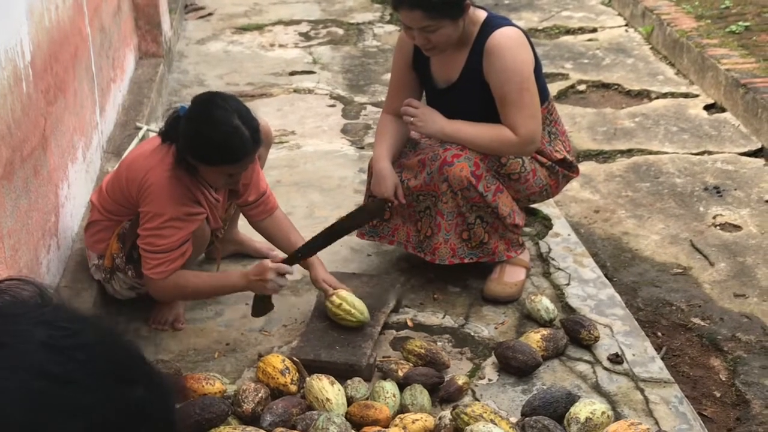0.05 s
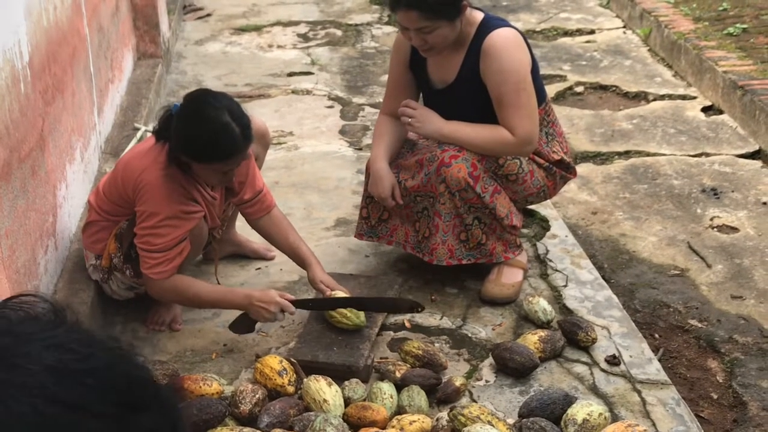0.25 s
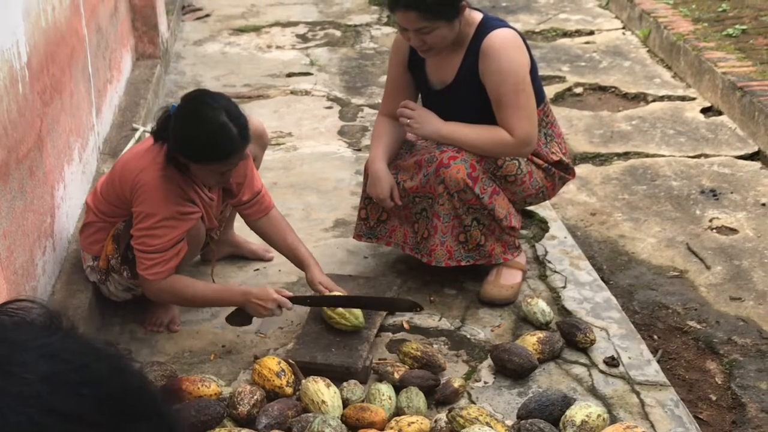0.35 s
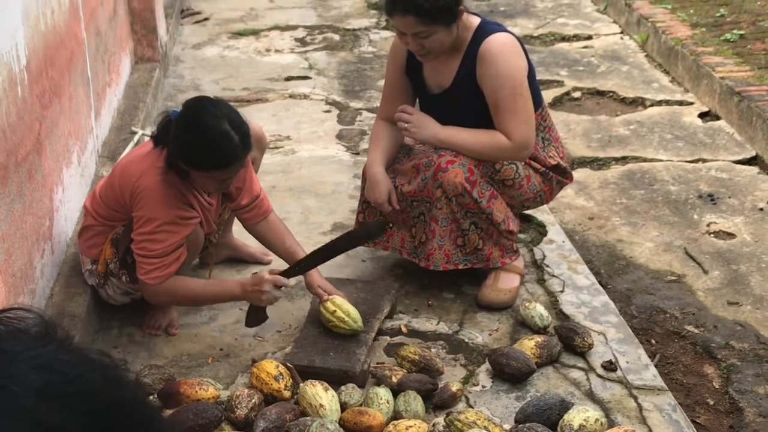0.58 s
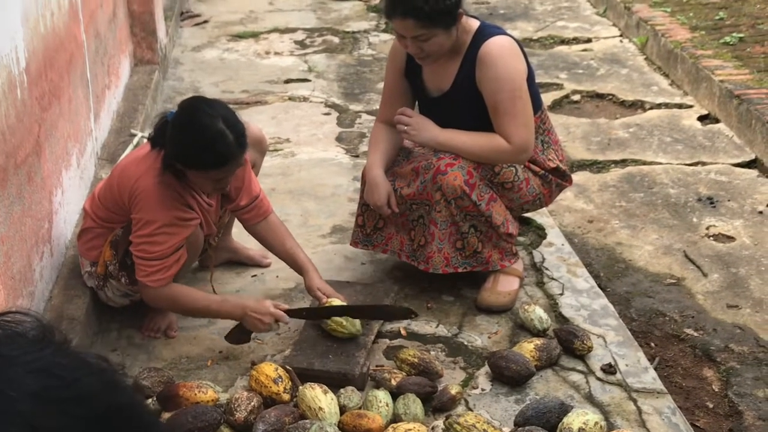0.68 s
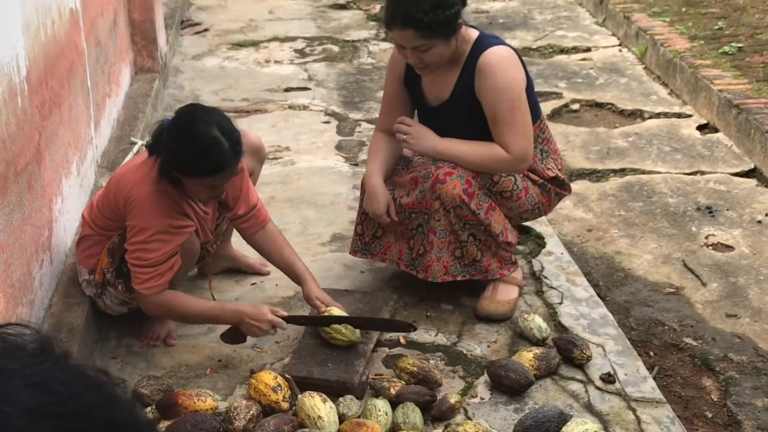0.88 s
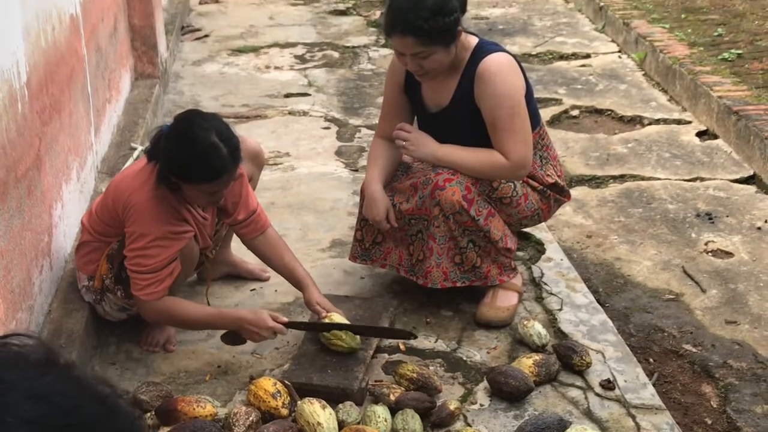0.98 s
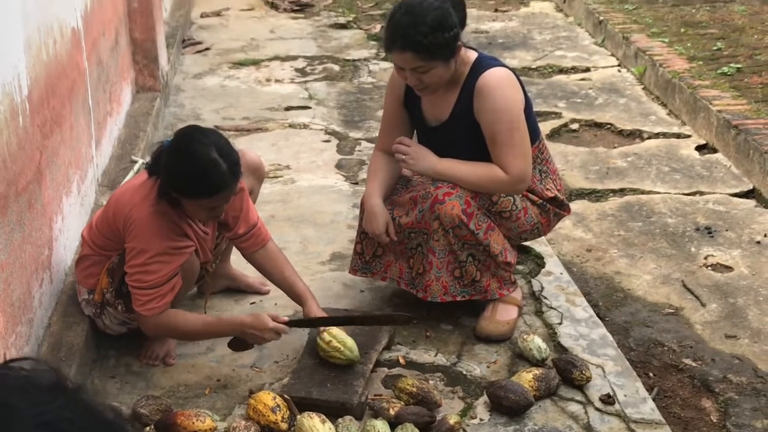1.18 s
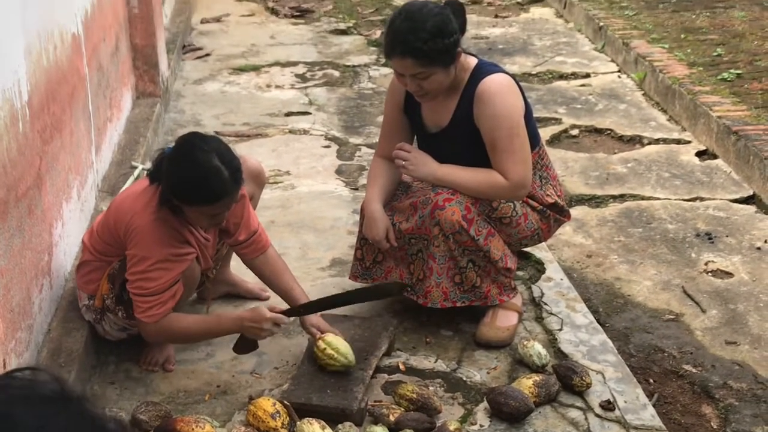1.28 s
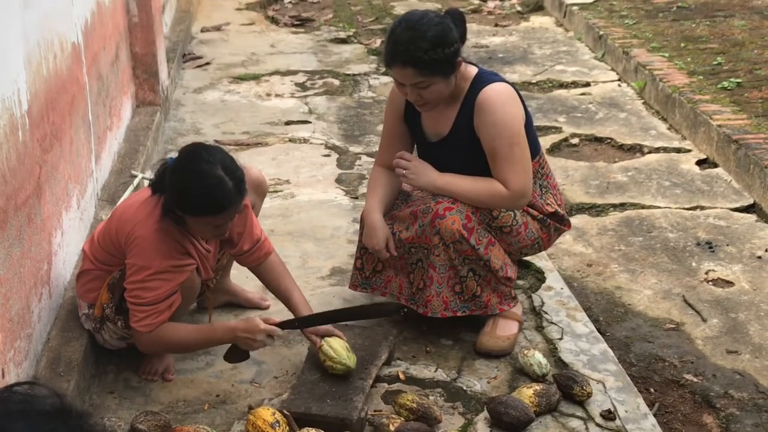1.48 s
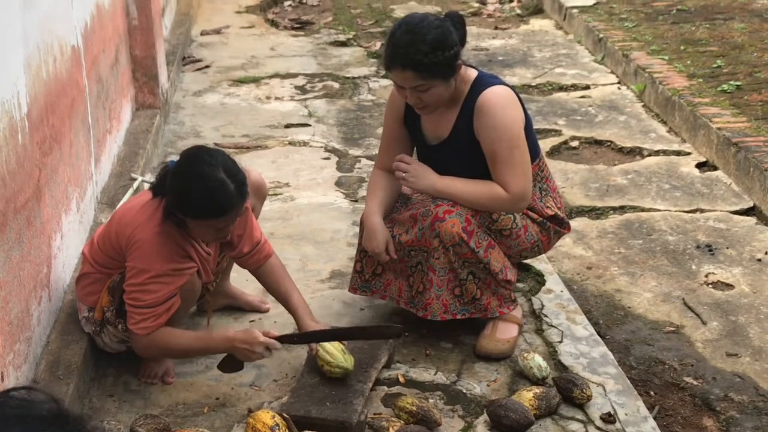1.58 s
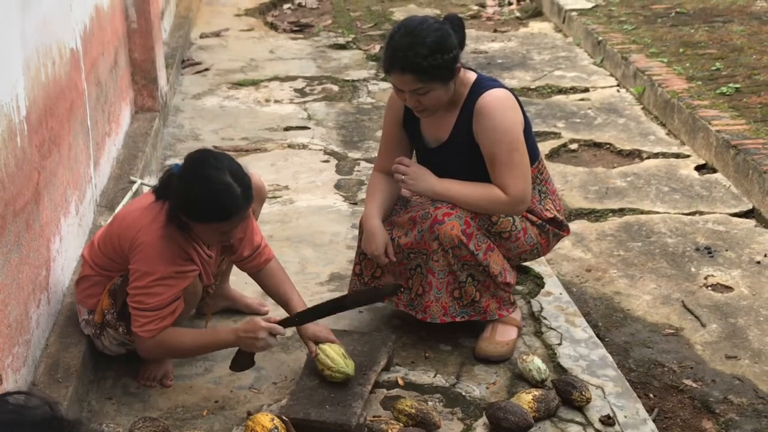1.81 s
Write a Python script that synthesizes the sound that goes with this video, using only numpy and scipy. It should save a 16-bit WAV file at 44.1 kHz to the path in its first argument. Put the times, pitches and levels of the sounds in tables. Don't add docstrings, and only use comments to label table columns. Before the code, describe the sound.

A machete chops twice into a hard fruit pod on a wooden board in a paved alley

```python
import sys
import numpy as np
from scipy import signal
from scipy.io import wavfile

SR = 44100
rng = np.random.default_rng(int(sys.argv[2]) if len(sys.argv) > 2 else 0)


def gain_from_db(level_db):
    decades = np.asarray(level_db, float) / 20
    return 10 ** decades


def wav_out(sig):
    wavfile.write(sys.argv[1], SR, np.round(np.clip(np.atleast_2d(sig).T, -1, 1) * 32767).astype(np.int16))


N = 81585

# (blade enters [s], time to full bite [s], hold [s], crunch level [dB], board knocked [s])
CHOP_EVENTS = [
    (0.2203, 0.005, 0.0025, -17, 0.2268),
    (0.7408, 0.000805, 0.0083, -21.5, 0.7425),
]
# (frequency [Hz], density [dB per Hz])
CRUNCH_COLOURS = [
    [(600, 13.5), (900, -0.5), (1850, -8.5), (2300, -3), (3740, -5), (7570, -5), (11500, -10), (16000, -4)],
    [(350, 4), (600, 5), (1340, 0), (1900, -13.5), (2400, -2), (6000, -6), (11300, -7), (16000, -6.5)],
]


def rms_one(x):
    return x / np.sqrt(np.mean(x ** 2) + 1e-20)


def in_time(rows):
    s, *columns = np.transpose(rows)
    return [np.interp(np.arange(N) / SR, s, c) for c in columns]


def at_hz(points, hz):
    table_hz, values = np.array(points).T
    return np.interp(np.log(hz), np.log(table_hz), values)


def drift(rate_hz):
    r = np.exp(-2 * np.pi * rate_hz * 40 / SR)
    settle = 2000
    noise = rng.standard_normal(N // 40 + 2 + settle)
    slow = signal.lfilter([1], [1, -2 * r, r * r], noise)[settle:]
    return np.interp(np.arange(N) / 40, np.arange(len(slow)), rms_one(slow))


def ring(x, hz, t60):
    r = gain_from_db(-60 / (t60 * SR))
    w = 2 * np.pi * hz / SR
    return signal.lfilter([0, np.sin(w)], [1, -2 * r * np.cos(w), r * r], x + 1e-18)


def band(x, low_hz, high_hz):
    edges = [low_hz, min(high_hz, 0.47 * SR)]
    return signal.sosfilt(signal.butter(2, edges, "band", fs=SR, output="sos"), x)


def bank(sources, gain):
    edges = 22 * 2 ** np.arange(0, 9.8, 1 / 3)
    total = 0
    for k, (low, high) in enumerate(zip(edges, edges[1:])):
        total = total + gain(np.sqrt(low * high)) * band(sources[k % len(sources)], low, high)
    return total


def bed(spectrum, patchy_db):
    (low_hz, low_db), (high_hz, high_db) = spectrum[0], spectrum[-1]
    colour = [(low_hz / 2, low_db - 30)] + list(spectrum) + [(high_hz * 2, high_db - 20)]
    noise = rng.standard_normal((2, N))
    return rms_one(bank(noise, lambda hz: gain_from_db(at_hz(colour, hz) + patchy_db * drift(9.6))))


def hum():
    # (time [s], frequency [Hz], level [dB])
    low_tone = [(0, 61.8, -46), (.2, 62.86, -49.5), (.45, 62.46, -51.5), (.65, 63, -57), (.8, 65.8, -47.5),
                (1.0, 66.95, -55.5), (1.15, 61.7, -49.5), (1.3, 60.42, -55), (1.85, 58.8, -52)]
    high_tone = [(0, 156.6, -51.5), (.12, 156.2, -45.5), (.3, 153.5, -49.5), (.75, 154, -59),
                 (.95, 160.1, -52), (1.05, 153, -51), (1.2, 149.8, -48.5), (1.5, 150.8, -55.5),
                 (1.85, 150, -55.5)]
    flutter_db = 2
    total = 0
    for rows in (low_tone, high_tone):
        hz, db = in_time(rows)
        sine = np.sin(2 * np.pi * np.cumsum(hz) / SR)
        total = total + np.sqrt(2) * gain_from_db(db + flutter_db * drift(12.0)) * sine
    return total


def rumble():
    # (frequency [Hz], density [dB per Hz])
    rumble_colour = [(15, -30), (25, 14.5), (54, -5), (102, 1), (151, -2), (293, -12.5), (368, -18.5),
                     (868, -28), (1200, -26), (1560, -65), (2640, -120)]
    # (time [s], level [dB])
    swelling = [(0, 5), (.4, 2.5), (.65, 1.5), (.95, 4), (1.15, 10), (1.3, 4.5), (1.5, 6), (1.85, 2.5)]
    return gain_from_db(-52 + in_time(swelling)[0]) * bed(rumble_colour, patchy_db=3.0)


def air():
    # (frequency [Hz], density [dB per Hz])
    air_colour = [(600, -1), (1500, -5), (3000, -8.5), (6500, -12), (8000, -15.5), (11000, -13.5),
                  (13500, -17), (16000, -6)]
    # (time [s], level [dB])
    rustling = [(0, -1.5), (.2, 0), (.4, 5), (.65, 3.5), (.72, 0.5), (.95, -1), (1.4, -1.5), (1.5, 1),
                (1.62, -1.5), (1.85, -2)]
    return gain_from_db(-64.5 + in_time(rustling)[0]) * bed(air_colour, patchy_db=1.4)


def insects():
    # (frequency [Hz], width [Hz], level [dB])
    cricket_bands = [(5340, 200, -76), (5250, 27, -74.5), (5473, 153, -71), (5750, 350, -80)]
    katydid_hz = [12700, 13900, 15000]
    first_s, period_s, katydid_db = 0.0555, 0.1024, -57.5
    others_per_s, others_db = 22, -60.5
    choir = 0
    for hz, width, db in cricket_bands:
        choir = choir + gain_from_db(db) * rms_one(band(rng.standard_normal(N), hz - width / 2, hz + width / 2))
    tick = gain_from_db(others_db + 2.8 * rng.standard_normal(N)) * (rng.random(N) < others_per_s / SR)
    steady_s = first_s + period_s * np.arange(18)
    tick[(steady_s * SR).astype(int)] = gain_from_db(katydid_db)
    return choir + sum(ring(tick, hz, t60=0.003) for hz in katydid_hz)


def engine():
    # (time [s], level [dB])
    throb = [(0, -50), (.15, -56.5), (.25, -47.5), (.65, -47.5), (.8, -52), (.95, -71.5), (1.85, -71)]
    # (frequency [Hz], level [dB], t60 [s])
    exhaust = [(90, -6.5, 0.29), (121.5, 10.5, 0.13)]
    first_s, period_s, count = 0.043, 0.0652, 27
    fire = np.zeros(N)
    firing_s = first_s + period_s * np.arange(count)
    fire[(firing_s * SR).astype(int)] = gain_from_db(0.491 * rng.standard_normal(count))
    puffs = band(sum(gain_from_db(db) * ring(fire, hz, t60) for hz, db, t60 in exhaust), 63, 141)
    return gain_from_db(in_time(throb)[0] + 4) * rms_one(puffs)


def grains(count):
    per_s, spread_db = 10000, 4
    happens, strength, side = rng.random((count, 3)).T
    snaps = (happens < per_s / SR) * gain_from_db(-spread_db * np.log(strength + 0.01))
    return rms_one(snaps * np.sign(side - 0.5))


def ticks():
    # (time [s], level [dB], frequency [Hz], length [s])
    small_ticks = [(0.13, -68, 9000, 0.0038), (0.159, -62.5, 4200, 0.013), (0.168, -51.5, 10600, 0.002),
                   (0.211, -63, 2980, 0.0078), (0.383, -55, 2900, 0.0064), (0.442, -60, 3200, 0.011),
                   (0.4602, -42, 4730, 0.0037), (0.4635, -52, 7400, 0.0015), (0.4639, -52, 14000, 0.003),
                   (0.4645, -54.5, 2430, 0.0026), (0.4845, -56, 12000, 0.0019), (0.503, -54, 14500, .002),
                   (0.619, -57.5, 2700, 0.0079), (0.628, -59, 9000, 0.0059), (0.648, -54.5, 12000, 0.0031),
                   (0.654, -62, 2970, 0.0076), (0.671, -62, 13500, .002), (0.688, -48, 2870, 0.0051),
                   (0.689, -55, 8000, 0.0024), (0.72, -61, 13500, .002), (0.732, -55, 3240, 0.0067),
                   (0.741, -38, 6030, 0.0022), (0.955, -67, 7500, .002), (0.994, -55, 10000, 0.0035),
                   (1.126, -60.5, 5860, 0.0032), (1.131, -64, 2580, 0.0038), (1.051, -67.5, 1100, 0.11),
                   (1.54, -68, 3370, .015), (1.324, -65, 11060, 0.0022), (1.33, -64, 10100, .002),
                   (1.435, -63, 1301, 0.012), (1.444, -67, 3320, 0.014), (1.448, -63.5, 7500, .004),
                   (1.471, -61, 2900, 0.004), (1.472, -64, 9000, .002), (1.537, -68, 6530, 0.025),
                   (1.56, -64, 8000, 0.002), (1.576, -62, 2398, 0.0068)]
    half_width_octaves, dies_db = 0.55, 9
    out = np.zeros(N + SR)
    t = np.arange(SR // 8) / SR
    for s, db, hz, length in small_ticks:
        low_hz, high_hz = hz * 2 ** -half_width_octaves, hz * 2 ** half_width_octaves
        puff = rms_one(band(grains(len(t)), low_hz, high_hz))
        start = int(s * SR)
        out[start:start + len(t)] += gain_from_db(db - dies_db * (t / length) ** 2) * puff
    return out[:N]


def scatter(colour):
    # (frequency [Hz], t60 [s])
    alley_decay = [(200, 0.33), (700, 0.2), (2000, 0.19), (6000, 0.18), (14000, 0.14)]
    far_db, far_t60_s, patchy_db = -25, 0.67, 0.8
    t = np.arange(SR * 2 // 3) / SR
    shared_patches = patchy_db * drift(82)[:len(t)]

    def gain(hz):
        decay = gain_from_db(-60 * t / at_hz(alley_decay, hz)) + gain_from_db(far_db - 60 * t / far_t60_s)
        own_patches = patchy_db * drift(82)[:len(t)]
        return gain_from_db(at_hz(colour, hz) + shared_patches + own_patches) * decay

    tail = bank(rng.standard_normal((2, len(t))), gain)
    return t, tail / np.sqrt(np.mean(tail[:SR // 100] ** 2))


def alley(x):
    t, tail = scatter([(100, 0.011), (16000, 0.0042)])
    delayed = tail * (t > 0.0014) / np.sqrt(np.sum(tail ** 2))
    return gain_from_db(-13) * signal.fftconvolve(x, delayed)[:N]


def crunch():
    lowest_hz = [1500, 500]
    bite_rise_db, t60_s = 17.5, 0.033
    out = np.zeros(N)
    t = np.arange(SR // 10) / SR
    for (s, rise, hold, db, _), colour, low_hz in zip(CHOP_EVENTS, CRUNCH_COLOURS, lowest_hz):
        ends = [(colour[0][0] / 2, colour[0][1] - 20)] + list(colour)
        coloured = bank([grains(len(t))], lambda hz: gain_from_db(at_hz(ends, hz)))
        fibres = rms_one(band(coloured, low_hz, SR))
        bite = -bite_rise_db * np.clip(1 - t / rise, 0, 1)
        stop = -60 * np.clip(t - rise - hold, 0, 1) / t60_s
        start = int(s * SR)
        out[start:start + len(t)] += gain_from_db(db + bite + stop) * fibres
    return out


def cracks():
    # (time [s], peak level [dB], frequency [Hz], time rung
    snaps = [(0.2245, -4, 9800, 8.2), (0.2264, -9, 6040, 8), (0.2255, -14, 14500, 9.2),
             (0.2256, -21, 2290, 30), (0.743, -35, 2316, 79), (0.2247, -16, 3630, 19),
             (0.227, -10, 11360, 35), (0.7397, -31, 2800, 5.5), (0.7412, -17.5, 3115, 35),
             (0.742, -16.5, 5640, 62), (0.7455, -14.5, 6730, 45), (0.747, -24, 4500, 7.3),
             (0.7495, -17, 5800, 51), (0.7499, -12, 11340, 34), (0.4608, -29, 5500, 5),
             (0.4848, -40, 11000, 5)]
    out = np.zeros(N)
    for s, db, hz, cycles in snaps:
        start = int(s * SR)
        click = np.zeros(N - start)
        click[0] = gain_from_db(db)
        out[start:] += ring(click, hz, cycles / hz)
    return out


def knock():
    # (frequency [Hz], t60 [s], first chop [dB], second chop [dB])
    modes = [(183, 0.064, -22.5, -25.5), (267, 0.12, -23.5, -39), (289.8, 0.16, -24.5, -32.5),
             (376.5, 0.099, -25.5, -31), (467, 0.05, -50, -66), (601.4, .13, -24, -32),
             (640, 0.16, -30, -36.5), (713, 0.072, -24, -35.5), (852, 0.051, -19, -26.5),
             (912, 0.045, -15.5, -43), (1029, 0.06, -32, -27.5), (1277, 0.032, -25, -34.5),
             (1470, 0.063, -37, -25.5), (1650, 0.15, -48.5, -36)]
    shudder_cycles, longest_t60_s, longest_cycles = 0.9, 0.2, 100
    struck = [int(chop[4] * SR) for chop in CHOP_EVENTS]
    out = 0
    for k, (hz, t60, *db) in enumerate(modes):
        push = np.zeros(N)
        push[struck] = gain_from_db(np.array(db)) * (-1) ** k
        mode = ring(push, hz, min(t60, longest_t60_s, longest_cycles / hz))
        swell_t60 = 3 * shudder_cycles / hz
        out = out + ring(mode, hz, swell_t60) * 2 * np.log(1000) / (swell_t60 * SR)
    return out


def echoes():
    echo_db = [-30, -29.5]
    builds_s = 0.0051
    out = np.zeros(N)
    for (s, rise, *_), colour, db in zip(CHOP_EVENTS, CRUNCH_COLOURS, echo_db):
        t, tail = scatter([(colour[0][0] * 0.52, colour[0][1] - 25)] + list(colour))
        start = int((s + rise) * SR)
        out[start:start + len(t)] += gain_from_db(db) * tail * np.minimum(t / builds_s, 1)
    return out


def creaks():
    # (time [s], level [dB], frequency [Hz], length [s])
    rubs = [(1.077, -59.5, 378.4, 0.14), (1.09, -63.5, 680, 0.086), (1.172, -55, 298.3, 0.063),
            (1.234, -65.5, 1470, 0.021), (1.436, -70, 1730, 0.059), (1.43, -65, 856, 0.026),
            (1.478, -58.5, 857, 0.022), (1.485, -72, 1091, 0.039), (1.538, -70, 3300, 0.029),
            (1.548, -68.5, 1183, 0.043), (1.554, -65.5, 870, 0.051)]
    half_width = 0.04
    out = np.zeros(N)
    t = np.arange(SR // 6) / SR
    for s, db, hz, length in rubs:
        noise = rng.standard_normal(2 * len(t))
        tone = band(noise, hz * (1 - half_width), hz * (1 + half_width))[len(t):]
        swell = np.sin(np.pi * np.clip(t / length, 0, 1)) ** 0.5
        start = int(s * SR)
        out[start:start + len(t)] += gain_from_db(db) * rms_one(tone * swell) * np.sqrt(np.mean(swell ** 2))
    return out


def clink():
    # (frequency [Hz], level [dB], t60 [s])
    trinket = [(10140, 0, .13), (11690, -5, .08), (13200, -11, .07), (14410, -3, .09), (15600, -7, .06)]
    tap = np.zeros(N)
    tap[int(1.1278 * SR)] = gain_from_db(-59.5)
    return sum(gain_from_db(db) * ring(tap, hz, t60) for hz, db, t60 in trinket)


def scene():
    background = hum() + rumble() + air() + insects() + engine()
    near = ticks() + knock() + creaks() + clink()
    duller = background + near + alley(near) + echoes()
    top_cut = signal.cheby2(20, 50, 16050, fs=SR, output="sos")
    mix = crunch() + cracks() + signal.sosfilt(top_cut, duller)
    return mix[None]


def band_limit(x):
    return signal.sosfilt(signal.butter(12, 16820, fs=SR, output="sos"), x)


def record(dry):
    bass_cut = signal.butter(8, 41.8, "high", fs=SR, output="sos")
    top_cut = signal.cheby2(14, 60, 16850, fs=SR, output="sos")
    thin = signal.sosfilt(bass_cut, dry)
    return band_limit(signal.sosfilt(top_cut, thin))


dry = scene()
out = record(dry)
wav_out(out)
```